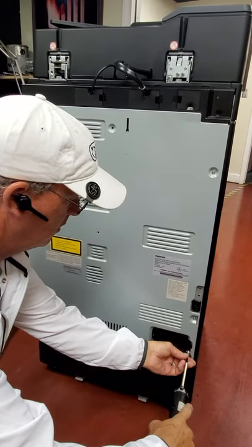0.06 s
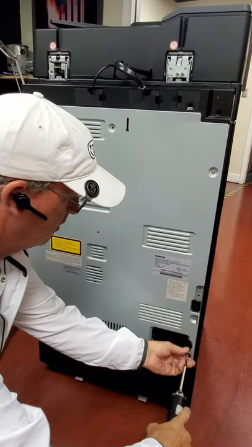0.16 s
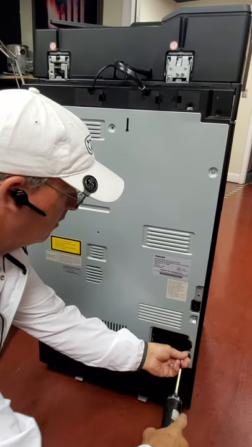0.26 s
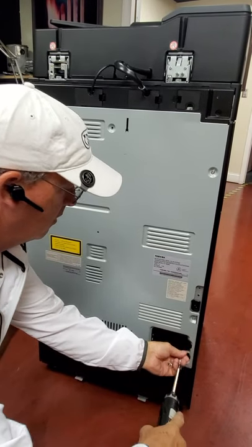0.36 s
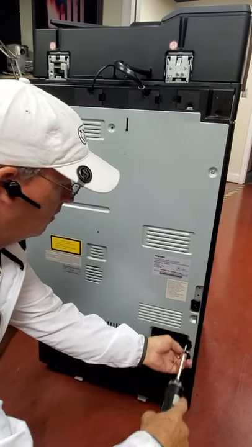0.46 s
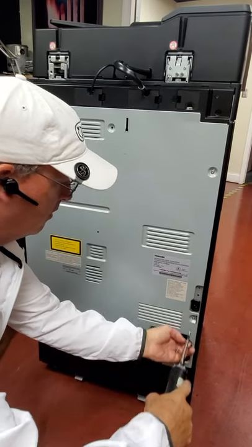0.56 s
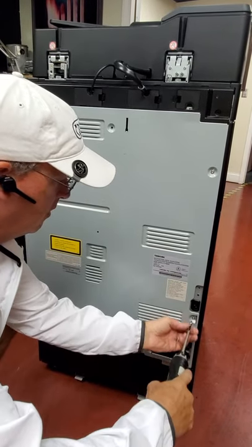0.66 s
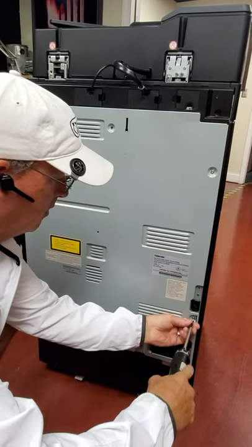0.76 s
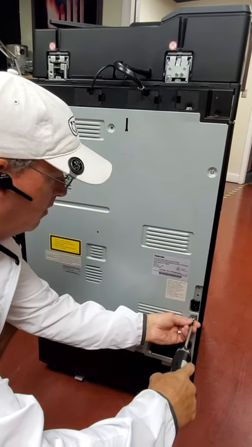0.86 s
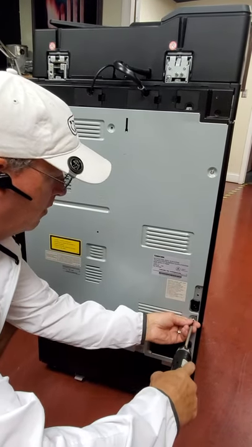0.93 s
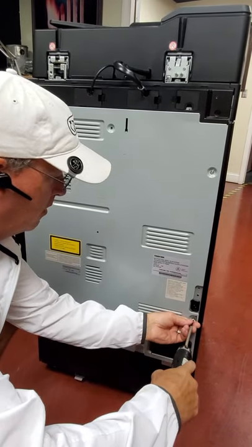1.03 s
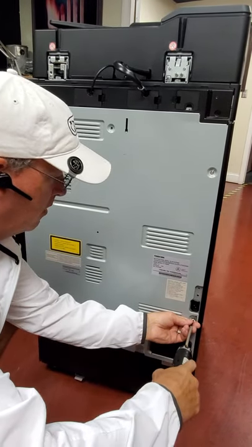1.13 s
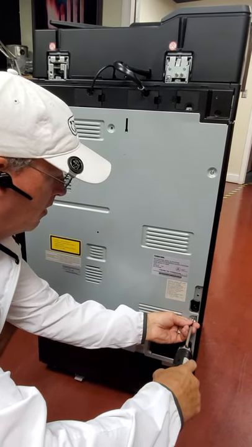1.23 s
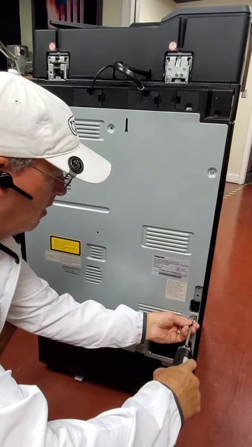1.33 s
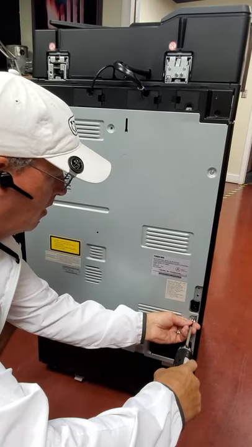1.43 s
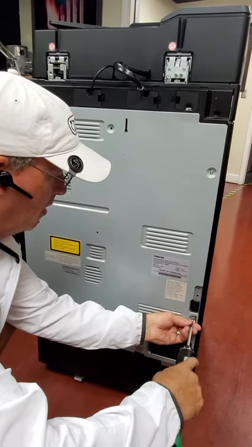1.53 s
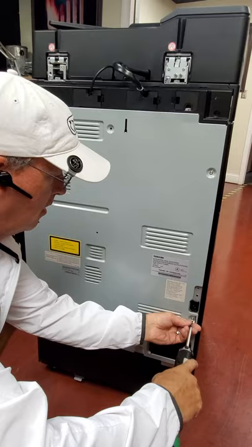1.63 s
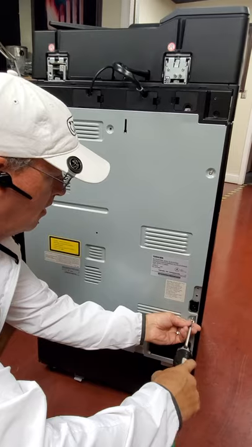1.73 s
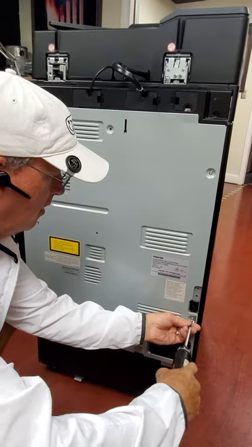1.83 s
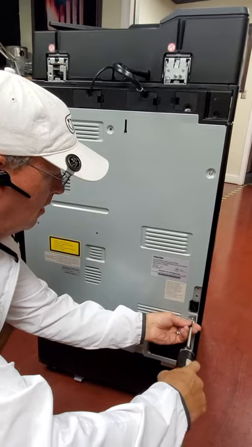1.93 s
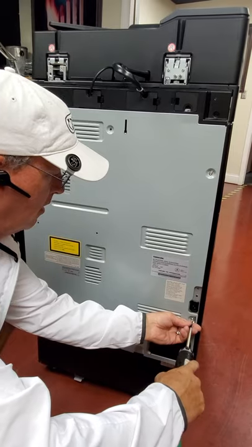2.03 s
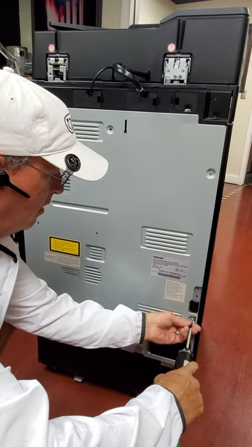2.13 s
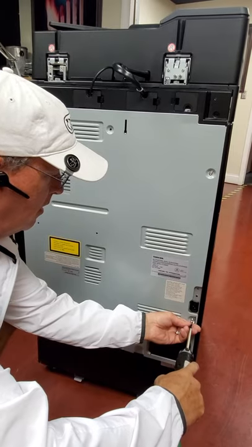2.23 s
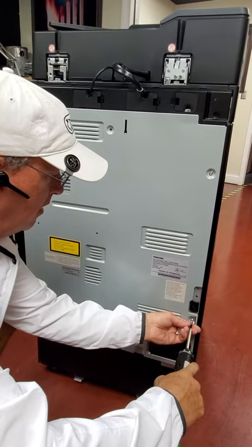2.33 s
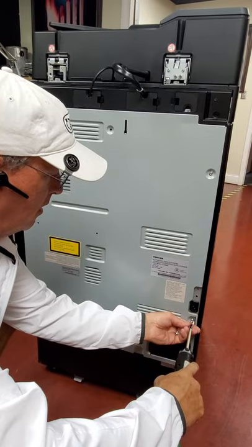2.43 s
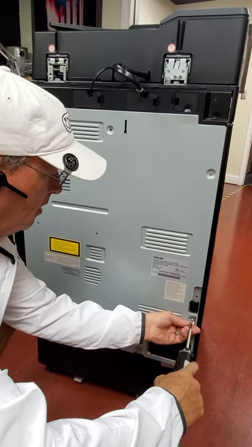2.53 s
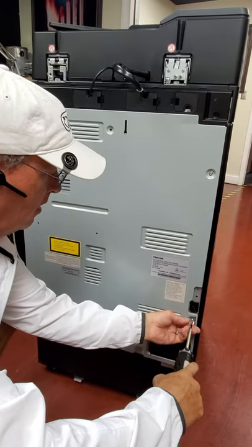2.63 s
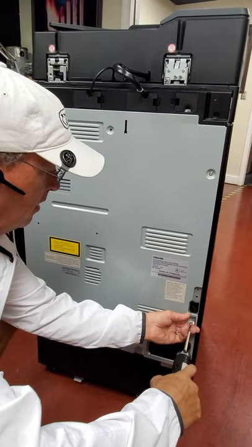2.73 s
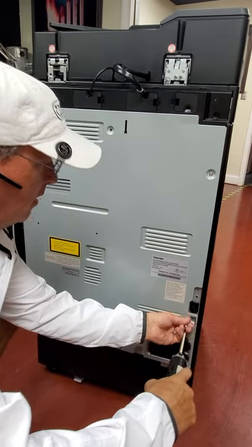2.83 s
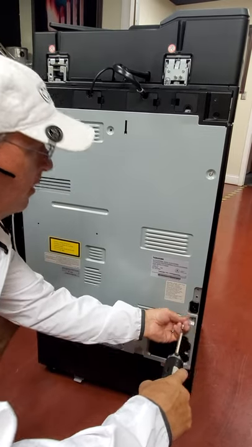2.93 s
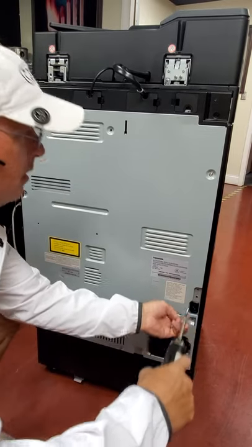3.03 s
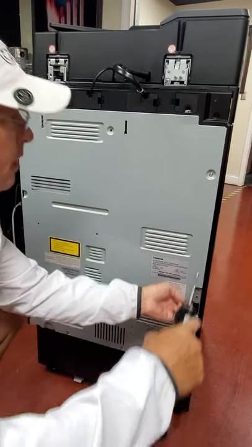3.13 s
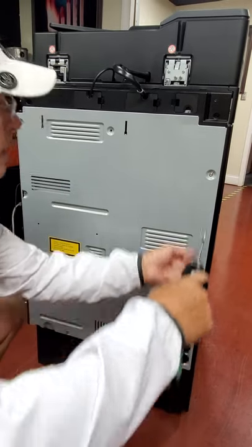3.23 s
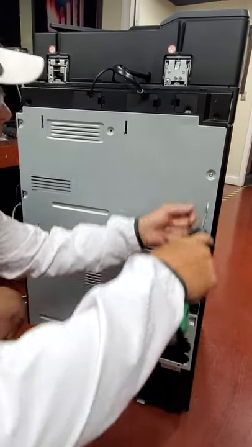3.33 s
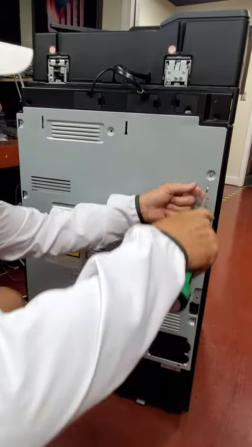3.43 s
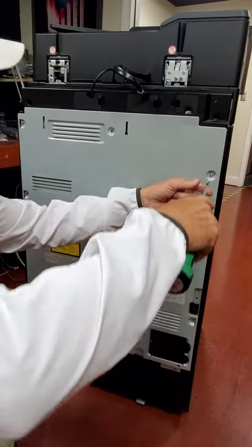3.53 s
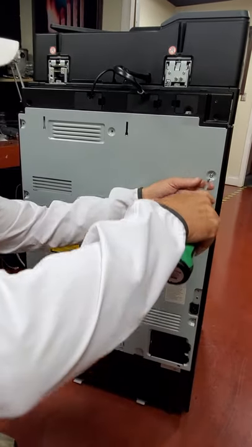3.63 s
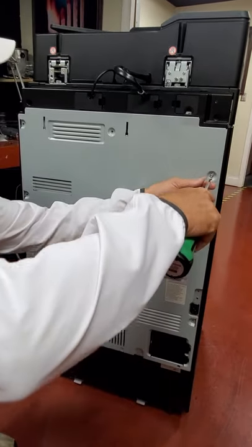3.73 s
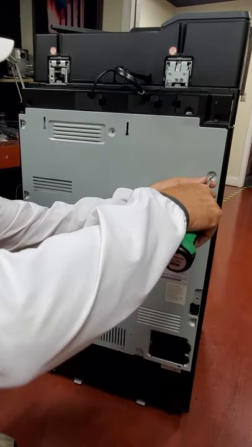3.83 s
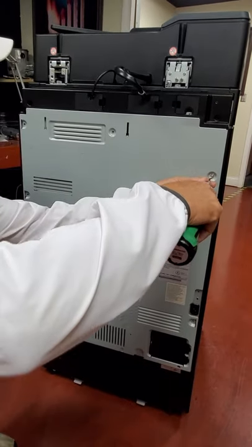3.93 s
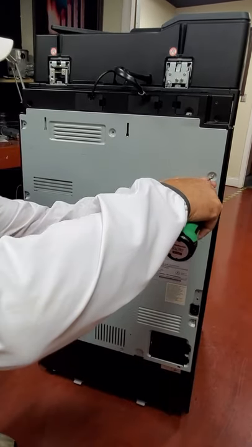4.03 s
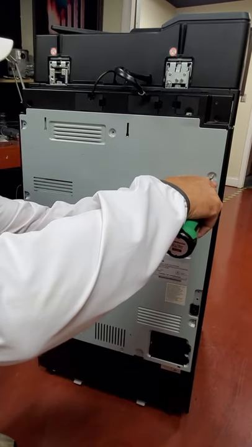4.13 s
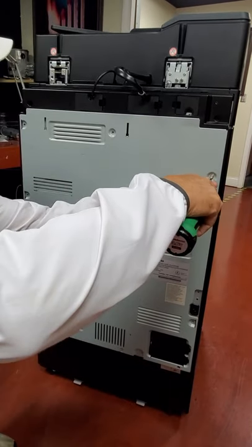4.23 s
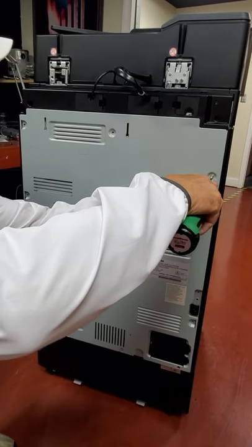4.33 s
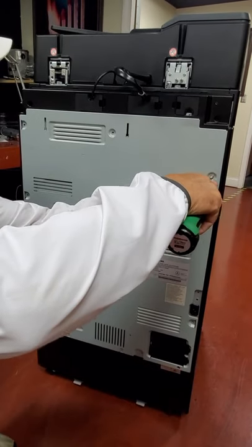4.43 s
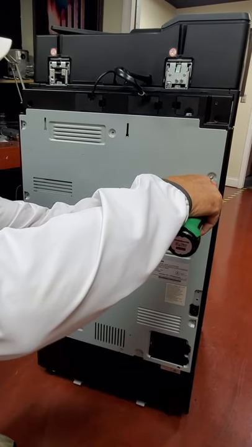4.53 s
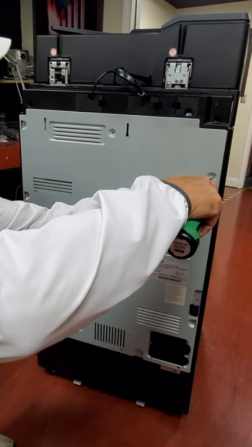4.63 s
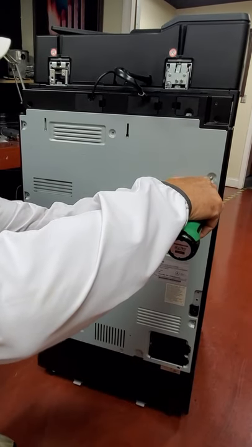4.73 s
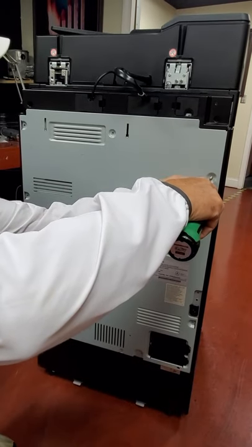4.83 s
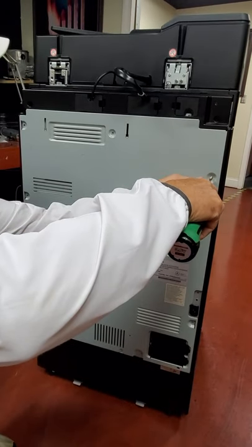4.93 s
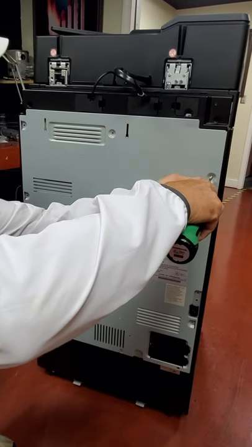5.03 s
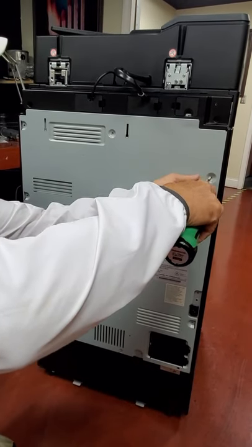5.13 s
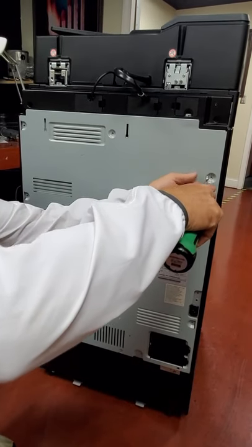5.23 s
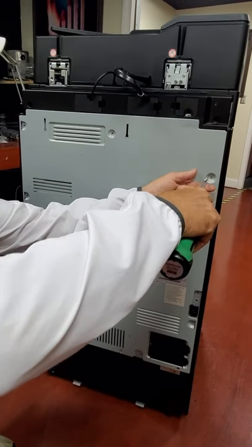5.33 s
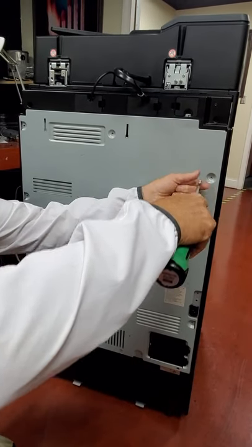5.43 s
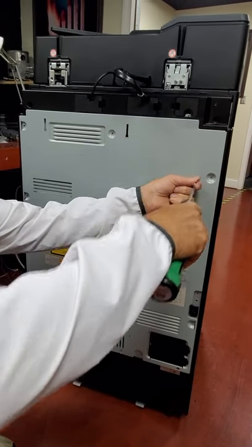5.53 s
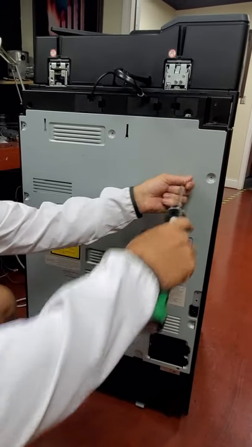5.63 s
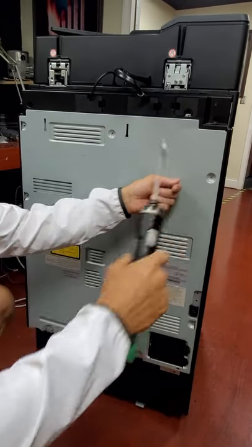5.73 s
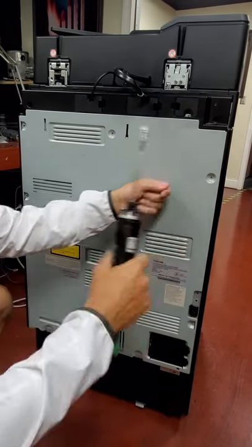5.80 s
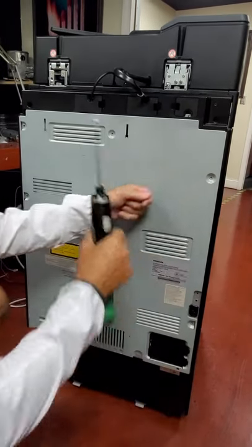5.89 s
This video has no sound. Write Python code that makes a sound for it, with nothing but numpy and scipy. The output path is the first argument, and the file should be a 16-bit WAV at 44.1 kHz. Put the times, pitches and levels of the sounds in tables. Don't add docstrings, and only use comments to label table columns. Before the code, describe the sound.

Gritty cordless screwdriver noise in a hard-floored room, picked up fairly close in stereo with a faint background hush. First a dying whirr, then a bit clicking into place, a drive of over a second with panel rumble, and a falling whirr. A pause brings knocks and scraping on sheet metal, then a sharp clack-filled short drive, a slowing whirr and faint loose-screw tinkles.

```python
import sys
import numpy as np
from scipy import signal
from scipy.fft import rfft, irfft, next_fast_len
from scipy.io import wavfile
from scipy.ndimage import uniform_filter1d

SR = 44100
rng = np.random.default_rng(int(sys.argv[2]) if len(sys.argv) > 2 else 0)


def inscribe(sig):
    pcm = np.round(np.clip(np.atleast_2d(sig).T, -1, 1) * 32767)
    wavfile.write(sys.argv[1], SR, pcm.astype(np.int16))


def decibels_to_gain(level_db):
    exponent = np.asarray(level_db, float) / 20
    return 10 ** exponent


N = 262836
T = np.arange(N) / SR

# pull_s, spinup_s, release_s, stop_s, hiss_db
BURSTS = [
    (-1, .1, .1, .55, -35.5),
    (1.44, .07, 2.7, 3.17, -35.2),
    (4.316, .02, 5.19, 5.76, -35.8),
]
# start_s, end_s
POWERED = [
    (1.74, 2.7),
    (4.4, 5.2),
]
# time_s, pitch_hz, level_db
SIXTH_ORDER = [
    [(1.92, 1004, -52.5), (1.974, 1012, -39), (2.048, 1015, -36.5), (2.076, 1014, -44), (2.126, 1009, -37),
     (2.212, 1013, -36.5), (2.32, 1026, -47), (2.5, 1025, -45.5), (2.62, 1011, -45.5), (2.67, 1005, -60)],
    [(4.46, 985, -62), (4.52, 993.8, -46.5), (4.604, 1002, -34), (4.75, 1008, -40), (4.79, 1016, -62)],
    [(4.84, 1034, -52), (5.0, 1036, -44), (5.012, 1037, -46), (5.09, 1037, -48), (5.12, 1010, -46),
     (5.15, 1000, -64)],
]
# time_s, half_length_s, extra_hiss_db
STRAINS = [
    (1.53, .04, 3),
    (1.61, .06, 6),
    (4.427, .02, 5),
    (4.65, .03, 2.5),
    (5.1, .05, .6),
]
SPINUP_DB, COAST_DB = 22, 33
EASE_S, EASE_DB = .1, -3
FILL_S, FILL_DB = .005, 8
GRAB_S = 5.62
JOLT_AFTER_S, JOLT_S, FULL_SPEED_S = .045, .03, .1
IDLE_HZ, LOADED_HZ, FREE_HZ = 40, 161, 166
SLOWING = .7

# pitch_hz, level_db (per Hz)
GEAR_COLOUR = [(1180, -27), (2000, -7.5), (2140, -13), (2330, -5.5), (2900, -2), (3170, -2), (3750, 0),
               (5140, -10.5), (6130, -4.5), (7360, -9), (9000, -22), (11700, -40), (19800, -120)]
BRUSH_COLOUR = [(5000, -10), (8500, -19), (9210, -24.5), (10900, -17), (15400, -3), (16200, -12),
                (16400, -28), (16500, -71)]
SHELL_COLOUR = [(590, -49.5), (1000, -20), (1170, -3), (1290, -2), (1480, 0), (1590, 2), (2130, -6.5),
                (2300, -10), (2990, -32.5), (5060, -120)]
HOUSING_COLOUR = [(240, -28), (400, -19.5), (465, -20), (674, -12.5), (759, -7), (1000, -11.5), (1150, -5),
                  (1500, -48.5), (2530, -120)]
# running_db, per_strain_db (per dB), standstill_db, release_jolt_db, pull_db
BRUSH_LAYER = (-3.2, -1, -5, 3.5, -14)
SHELL_LAYER = (-5.5, .4, 3, -1, 8)
HOUSING_LAYER = (-19.5, 2.2, -1, -4, 3)

# shell_hz, shell_db, tooth_order, tooth_db, second_tooth_db
COASTS = [
    (1640, -13, 10, -7, -14),
    (1400, -12, 10.8, -7, -6),
    (1530, -4, 10.8, -10, -12),
]
SHELL_WIDTH_HZ, TEETH_WIDTH_HZ = 190, 70
SECOND_TEETH = 1.24
TEETH_BEST_HZ, TEETH_STILL_DB = 1450, -17
RING_GROWS_DB = 6

ORDERS = [2, 4, 6, 7, 8, 10.1, 11, 14.1, 16.4, 18.03, 19.06, 20.33, 21.9, 24.08, 35, 35.3]
# long_drive_db, short_drive_db (over whine), follows_curve (0-1)
ORDER_LEVELS = [(-16, -6, 0), (-21.5, -9, 0), (-4.1, -2.6, .77), (-14, -4, 0), (-6, 0, 0), (-10, -22, 0),
                (-18, -4, .1), (-12, -19, .2), (-18, -16, .1), (-6, 6, .1), (-5, -2, 0), (-8, -18, .2),
                (-8, -19, .1), (-4, -20, .1), (-8, -15, 0), (-9, -11, 0)]
HEARD = {1: (4.78, 5.13), 3: (4.84, 5.14), 4: (4.68, 4.92), 6: (4.5, 4.75), 9: (4.52, 4.72),
         10: (4.75, 5.15)}
STEADY_WHINE_DB = -48

# pitch_hz, width_hz, level_db
BOOM_MODES = [(252.5, 63, -2.5), (307, 51, -1), (380, 28.6, -0.5), (570, 175, -6), (719, 173, -5.5)]
DEEP_MODES = [(72.2, 22, -5.5), (101.5, 14, 0.5), (136.5, 35, -2), (191.1, 36, -1)]
# pitch_hz, level_db (per Hz)
RATTLE_COLOUR = [(260, -37.5), (450, -6.5), (623, -2.5), (1070, -8), (1850, -6.5), (2410, -12),
                 (3100, -9.5), (4040, -22), (7360, -29), (9000, -47), (11700, -42), (19800, -120)]
# peak_s, boom_db, deep_over_boom_db, rise_s, fade_s (both for 20 dB)
JERKS = [(0, -50, -8, .01, .11), (1.486, -41, -6, .04, .2), (1.548, -32, 0, .09, .1),
         (1.606, -33, -6, .07, .11), (1.688, -34, -4.5, .08, .11), (1.75, -48, -4, .1, .07),
         (1.846, -48, -15, .2, .16), (2.472, -48, -10, .05, .08), (2.528, -49.5, -11, .08, .1),
         (2.68, -58, -8, .1, .13), (4.446, -39.5, -6, .05, .08), (4.55, -32, -17, .02, .1),
         (4.658, -30.5, -7.5, .035, .12), (4.818, -49, -18, .1, .08)]
# peak_s, boom_db, deep_over_boom_db, rise_s, fade_s
BUMPS = [(1.124, -62, -1, .025, .17), (1.284, -62, -12, .05, .12), (1.374, -61, 2, .06, .4),
         (3.438, -37, -8, .002, .015), (3.46, -42, -10, .01, .24), (3.545, -45, -9, .04, .2),
         (4.115, -47, -8, .04, .15), (5.312, -54, -3, .01, .07), (5.362, -53, -4, .006, .09),
         (5.67, -60, -2, .05, .1), (5.955, -55, -20, .04, .1)]
# peak_s, rattle_db, top_over_rattle_db, rise_s, fade_s
SCRAPES = [(.525, -78, 14, .004, .08), (.676, -66, 0, .003, .05), (1.165, -56, -20, .01, .02),
           (5.545, -52, -6, .003, .01), (1.245, -57, -30, .05, .02), (1.27, -39.5, -30, .002, .045),
           (1.342, -48, -30, .02, .14), (3.195, -66, -8, .005, .03), (3.222, -68, -2, .01, .2),
           (3.445, -59, -30, .004, .05), (3.46, -50, -2, .002, .12), (3.548, -42, -25, .08, .06),
           (3.57, -51, -2, .01, .13), (3.64, -52, -17, .1, .06), (4.085, -38.5, -23, .002, .12),
           (4.15, -43, -21, .05, .1), (4.275, -62, -8, .01, .06), (5.625, -48, -22, .003, .16),
           (5.76, -58, -6, .01, .05), (5.894, -68, 12, .005, .05), (5.95, -63, -7, .1, .05)]
TREMBLE_DB, TREMBLE_DEEP_DB = -26.5, -11

# start_s, peak_db, knock_db, snap_db, top_db (last three over the tick)
CLICKS = [(1.0984, -31, -7.5, -18, -28), (1.2578, -38, -2, -33, -37), (1.4466, -35, -27, -8, -14),
          (1.4682, -22, -14, -25, -20), (2.7374, -37, -32, 3, 10), (3.4367, -55, 26, -16, -19),
          (3.46, -35, -2, -1, -12), (3.514, -35, 2, -30, -30), (3.546, -39, 0, -25, -25),
          (3.5624, -38, -13, -3, -4), (3.924, -36, -4, -2.5, -4.5), (4.0615, -41, -7, -2.5, -4),
          (4.0823, -35, -2, -28, -22), (4.1205, -33, 3, -26, -25), (4.14, -40, -3, -20, -25),
          (4.167, -37, 4, -26, -25), (4.2706, -48.5, -5, -1, -9), (4.3192, -34, -25, -10, -15),
          (4.4185, -26, -20, -3, -6), (4.5437, -18.5, -3, -13, -14), (4.644, -23, -0.5, -3, -15)]
# start_s, peak_db, ring_db, snap_db, top_db (last three over the tick)
JINGLES = [
    (0.6742, -48, 2, -3, -1),
    (2.7455, -48, -10, 8, 24),
    (2.7525, -51, -10, 8, 24),
    (2.76, -49, -10, 8, 24),
    (2.7655, -49, -10, 6, 24),
    (2.7755, -52, -10, 8, 24),
    (5.7543, -36, 3.4, -14, -6),
    (5.7612, -40.5, 3, -18, 9),
    (5.7648, -42, -2, -3, 13),
    (5.895, -47, 3, -7, -4),
]
# pitch_hz, level_db (per Hz)
TICK_COLOUR = [(800, -13), (950, -3.5), (1570, -4.5), (1880, -4.5), (2400, -3), (4800, -4.5), (5200, -12),
               (5600, -11)]
SNAP_COLOUR = [(4600, -18), (5300, -7.5), (7300, 0), (8200, -1.5), (8700, -18)]
# pitch_hz, width_hz, level_db
KNOCK_MODES = [(320, 67, -6), (740, 110, 13), (148, 65, -10)]
SCREW_MODES = [(1690, 130, 0), (2720, 99, 6), (3600, 250, -12)]

# peak_s, pitch_hz,
# level_db, rise_s, fade_s (both for 20 dB)
SINGS = [(.18, 4100, -46, .06, .2), (.235, 1640, -48, .04, .06), (.45, 740, -67, .15, .5),
         (.678, 1640, -61, .006, .025), (1.11, 745, -54, .01, .12), (1.165, 760, -58, .03, .04),
         (1.12, 2090, -56, .02, .06), (1.275, 750, -53, .015, .15), (1.275, 1930, -59, .015, .1),
         (1.275, 1690, -57, .015, .06), (1.36, 555, -55, .05, .12), (1.86, 328, -41, .3, .09),
         (3.465, 4000, -55, .004, .05), (2.57, 1360, -41, .05, .08), (3.0, 790, -60, .08, .06),
         (3.05, 2200, -58, .05, .05), (3.2, 1560, -72, .1, .15), (3.24, 1330, -71, .06, .35),
         (3.25, 3440, -78, .08, .25), (3.93, 690, -52, .004, .04), (4.36, 1500, -47, .03, .06),
         (4.36, 2030, -47, .03, .05), (4.44, 690, -45, .1, .06), (4.68, 1840, -43, .05, .03),
         (5.05, 1500, -46, .04, .03), (5.07, 1200, -44, .05, .05), (5.19, 1460, -46, .12, .1),
         (5.55, 1600, -54, .05, .1), (5.65, 1620, -59, .04, .15), (5.7, 780, -58, .04, .04),
         (5.78, 1650, -62, .03, .15), (5.775, 10000, -62, .008, .05), (2.83, 1720, -48, .1, .08),
         (2.93, 1180, -51, .06, .1), (5.9, 1560, -65, .008, .06), (.68, 9300, -74, .006, .04),
         (5.9, 9400, -74, .006, .04), (.68, 3950, -68, .006, .025), (5.8, 3500, -66, .04, .1),
         (4.5, 3050, -46, .15, .1),
         (1.365, 140, -47, .025, .15), (1.43, 145, -54, .04, .1), (1.61, 382, -33, .12, .2),
          (1.6, 265, -41, .12, .1), (1.88, 92, -50, .1, .05), (1.98, 100, -57, .1, .05),
          (2.0, 400, -50, .04, .06), (1.62, 186, -37, .2, .12), (4.25, 100, -62, .1, .1),
          (5.65, 70, -64, .04, .04), (.07, 300, -54, .2, .2), (3.4405, 330, -35, .003, .016),
          (3.44, 150, -44, .003, .04), (4.0, 400, -58, .06, .1), (3.75, 200, -60, .08, .15),
          (3.462, 300, -42, .005, .07), (3.45, 200, -46, .01, .12), (3.545, 300, -43, .04, .08),
          (3.52, 190, -45, .02, .07), (3.53, 540, -47, .04, .08), (4.125, 640, -46, .03, .08),
          (4.2, 200, -57, .1, .12), (4.46, 340, -43, .08, .06), (4.56, 310, -41, .02, .08),
          (4.56, 610, -43, .02, .08), (4.665, 590, -40, .03, .08), (5.32, 240, -55, .01, .08),
          (5.955, 340, -56, .03, .05),
         (2.76, 4100, -43, .06, .3),
    (2.76, 7900, -46, .03, .15),
    (2.71, 800, -52, .05, .05),
    (4.5, 780, -47, .1, .1),
    (1.6, 760, -44, .12, .12),
    (4.1, 850, -50, .015, .1),
]
SING_WIDTH_HZ, SING_SHARE = 22, .04
SING_STEADY = .6

# pitch_hz, t60_s
ROOM_DECAY = [(150, 0.3), (500, 0.38), (1040, 0.37), (2760, 0.37), (7280, 0.45), (15000, 0.24)]
# pitch_hz, correlation (-1 to 1)
LIKENESS = [(30, .8), (60, 0.97), (130, 1), (290, 1), (640, 0.36), (1400, -0.13), (3100, -0.042),
            (15000, .01)]
# pitch_hz, level_db (per Hz)
HUSH_COLOUR = [(15, -6), (25, 1), (91, -8), (125, -29), (361, -4.5), (425, -23), (486, -9.5), (955, -12.5),
               (3880, -17), (7030, -24.5), (8050, -20), (8970, -39), (15800, -27)]
HUSH_DB = -69.5
# time_s, level_db (over the hush)
AIR_DRIFT = [(0, 8.5), (.8, 1), (.95, -3), (1.09, -4.5), (1.3, 0.5), (3.3, 2.5), (3.9, 1.5), (5.96, 6.5)]
# pitch_hz, left_over_right_db
LEAN = [(60, -1), (99, -2), (160, 0.5), (270, -6), (450, 2), (740, -3), (1220, -1), (2010, -2.0),
        (3330, -5.5), (5500, -2.5), (9080, 9.5), (15000, 6.0)]
EDGE_HZ = 15780


def shaft():
    rows = [(s, hz / 6) for table in SIXTH_ORDER for s, hz, _ in table]
    rows += [(s, LOADED_HZ) for s, _ in POWERED]
    for pull, spinup, release, stop, _ in BURSTS:
        rows += [(pull, IDLE_HZ), (pull + spinup, LOADED_HZ - IDLE_HZ), (release, FREE_HZ)]
        for left in np.linspace(0, .9, 10):
            rows.append((stop - left * (stop - release), FREE_HZ * left ** SLOWING))
    return np.interp(T, *np.transpose(sorted(rows)))


def effort():
    strain_db = sum(db * np.exp(-((T - s) / half) ** 2) for s, half, db in STRAINS)
    hiss, lost, jolt, start = np.zeros((4, N))
    for pull, spinup, release, stop, db in BURSTS:
        up = np.clip((T - pull) / spinup, 0, 1)
        down = np.clip((stop - T) / (stop - release), 0, 1)
        eased_db = EASE_DB * np.clip(1 + (T - release) / EASE_S, 0, 1)
        hiss += decibels_to_gain(db + eased_db + strain_db) * up ** (SPINUP_DB / 20) * down ** (COAST_DB / 20)
        lost += (1 - down) * (down > 0)
        start += np.clip(1 - (T - pull) / FULL_SPEED_S, 0, 1) * (up > 0)
        jolt += np.exp(-((T - release - JOLT_AFTER_S) / JOLT_S) ** 2)
    hiss *= np.clip((GRAB_S - T) / .06, 0, 1)
    hiss *= 1 + decibels_to_gain(FILL_DB) * np.exp(-T / FILL_S)
    return hiss, strain_db, lost, jolt, start


def motor(turns, hiss, strain_db, lost, jolt, start):
    grit_db = 3.35 * unit_rms(uniform_filter1d(rng.standard_normal(N), 30))
    throb = 1 + 0.37 * np.cos(4 * np.pi * turns)
    contacts = rng.standard_normal(N) * decibels_to_gain(grit_db) * throb
    out = unit_rms(colour(contacts, GEAR_COLOUR))
    layers = [(BRUSH_COLOUR, BRUSH_LAYER), (SHELL_COLOUR, SHELL_LAYER), (HOUSING_COLOUR, HOUSING_LAYER)]
    for body, (db, per_strain, still_db, jolt_db, start_db) in layers:
        level_db = db + per_strain * strain_db + still_db * lost + jolt_db * jolt + start_db * start
        out += unit_rms(colour(contacts, body)) * decibels_to_gain(level_db)
    return out * hiss * decibels_to_gain(1.07 * wander(rate_hz=12))


def rundown(speed_hz, coasting):
    noise, out = rng.standard_normal(N), 0
    coast = np.searchsorted([pull for pull, *_ in BURSTS[1:]], T)
    shell_hz, shell_db, teeth, first_db, second_db = np.array(COASTS)[coast].T
    layers = [(shell_hz, shell_db, SHELL_WIDTH_HZ)]
    for hz, db in [(teeth * speed_hz, first_db), (SECOND_TEETH * teeth * speed_hz, second_db)]:
        octaves_away = np.log2((hz + 1) / TEETH_BEST_HZ)
        layers.append((hz, db + TEETH_STILL_DB * octaves_away ** 2, TEETH_WIDTH_HZ))
    for hz, db, width_hz in layers:
        carrier = np.exp(2j * np.pi * np.cumsum(hz) / SR)
        r = np.exp(-np.pi * width_hz / SR)
        narrow = signal.lfilter([1], [1, -2 * r, r * r], noise / carrier)
        out = out + decibels_to_gain(db) * unit_rms((carrier * narrow).real)
    return out * coasting


def whine(turns):
    rows, out = np.concatenate(SIXTH_ORDER), np.zeros((2, N))
    for burst, (start, end) in enumerate(POWERED):
        on = slice(round(start * SR), round(end * SR))
        t = T[on]
        curve_db = np.interp(t, rows[:, 0], rows[:, 2])
        ends = signal.windows.tukey(len(t), .15)
        for row, (order, (*db, follows)) in enumerate(zip(ORDERS, ORDER_LEVELS)):
            level_db = db[burst] + follows * curve_db + (1 - follows) * STEADY_WHINE_DB
            if burst and row in HEARD:
                first, last = HEARD[row]
                level_db = level_db - 400 * np.maximum(np.maximum(first - t, t - last), 0)
            jitter = .03 * order * wander(rate_hz=14, at=t)
            for side in out:
                drift = jitter + 1.6 * rng.random() * (order > 8)
                swell_db = 5.0 * abs(1 - follows) * wander(rate_hz=6, at=t)
                tone = np.sqrt(2) * np.cos(2 * np.pi * order * turns[on] + drift)
                add(side, start, decibels_to_gain(level_db + swell_db) * tone * ends)
    return out


def panel(running):
    slip_size = decibels_to_gain(3.2 * np.minimum(rng.exponential(1, N), 4))
    slips = (rng.random(N) < 500 / SR) * slip_size * rng.choice([-1, 1], N)
    drive = unit_rms(slips) + 0.6 * rng.standard_normal(N)
    tremble = decibels_to_gain(TREMBLE_DB) * running
    boom = unit_rms(resonate(resonate(drive, BOOM_MODES), BOOM_MODES))
    boom = boom * (envelope(JERKS + BUMPS) + tremble)
    deep = unit_rms(resonate(resonate(drive, DEEP_MODES), DEEP_MODES))
    deep = deep * (envelope(JERKS + BUMPS, second=1) + decibels_to_gain(TREMBLE_DEEP_DB) * tremble)
    rattle = unit_rms(colour(drive, RATTLE_COLOUR)) * envelope(SCRAPES)
    top = unit_rms(colour(drive, BRUSH_COLOUR)) * envelope(SCRAPES, second=1)
    return boom + deep + rattle + top


def clicks(rows, body, contact_s):
    blow = 1. * (np.arange(3000) == 0)
    push = np.sin(np.pi * np.minimum(np.arange(3000) / SR / contact_s, 1)) + blow
    voices = [colour(blow, TICK_COLOUR), resonate(push, body)]
    voices += [colour(blow, SNAP_COLOUR), colour(blow, BRUSH_COLOUR)]
    voices = np.array([x / np.linalg.norm(x) for x in voices]) * decibels_to_gain([[19], [15], [19], [23]])
    out = np.zeros(N)
    for s, db, *over_db in rows:
        add(out, s, decibels_to_gain(db + np.array([0] + over_db)) @ voices)
    return out


def sings():
    left, other = rng.standard_normal((2, N))
    out = np.zeros((2, N))
    for s, hz, db, rise, fade in SINGS:
        on = slice(max(round((s - 2 * rise) * SR), 0), round((s + 2 * fade) * SR))
        t = T[on]
        mode = [(hz, SING_WIDTH_HZ + SING_SHARE * hz, 0)]
        level_db = db - 20 * np.maximum((s - t) / rise, (t - s) / fade)
        right = left[on] + min(hz / 900, 1.2) * other[on]
        for side, noise in zip(out, [left[on], right]):
            tone = unit_rms(resonate(resonate(noise, mode), mode))
            flutter = abs(signal.hilbert(tone, next_fast_len(len(tone)))[:len(tone)])
            tone = unit_rms(tone / (flutter + .2) ** SING_STEADY)
            add(side, t[0], tone * decibels_to_gain(level_db))
    return out


def room(x, direct_db, turns_hz):
    out = decibels_to_gain(direct_db) * np.array([x, np.roll(x, 8)])
    t = np.arange(400) * 64 / SR
    for k in range(3):
        tail = diffuse_pair(400, 256, lambda hz: -60 * t / read(ROOM_DECAY, hz)[:, None])
        tail *= np.clip(np.arange(tail.shape[1]) / 60, 0, 1)
        tail /= np.linalg.norm(tail, axis=1, keepdims=True)
        share = np.sqrt(2 / 3) * np.cos(np.pi * (turns_hz * T + k / 3))
        out += signal.oaconvolve((x * share)[None], tail, axes=1)[:, :N]
    return out


def hush():
    air = diffuse_pair(N // 256 + 5, 1024, lambda hz: read(HUSH_COLOUR, hz)[:, None])[:, :N]
    return decibels_to_gain(HUSH_DB) * unit_rms(air) * decibels_to_gain(np.interp(T, *np.transpose(AIR_DRIFT)))


def diffuse_pair(frames, size, points_db):
    hz = np.fft.rfftfreq(size, 1 / SR)
    a, b, c, d = rng.standard_normal((frames, len(hz), 4)).T
    same = np.clip(read(LIKENESS, hz), -1, 1)[:, None]
    left = a + 1j * b
    right = same * left + np.sqrt(1 - same ** 2) * (c + 1j * d)
    z = np.array([left, right]) * decibels_to_gain(points_db(hz))
    return signal.istft(z, nperseg=size, noverlap=size * 3 // 4)[1]


def unit_rms(x):
    return x / np.sqrt(np.mean(x ** 2) + 1e-20)


def read(points, hz):
    f, value = np.transpose(points)
    return np.interp(np.log(hz + 1), np.log(f + 1), value)


def colour(x, points):
    hz = abs(np.fft.fftfreq(4096, 1 / SR))
    edged = [(points[0][0] * .7, -70)] + list(points) + [(points[-1][0] * 1.08, -70)]
    log_gain = np.log(decibels_to_gain(read(edged, hz)))
    taps = np.fft.ifft(np.exp(np.conj(signal.hilbert(log_gain)))).real[:2048]
    return signal.oaconvolve(x, taps / np.linalg.norm(taps))[:len(x)]


def resonate(x, modes):
    out = np.zeros(len(x))
    for k, (hz, width_hz, db) in enumerate(modes):
        b, a = signal.iirpeak(hz, hz / max(width_hz, 8), SR)
        out += (-1) ** k * decibels_to_gain(db) * signal.lfilter(b, a, x)
    return out


def envelope(rows, second=0):
    power = np.zeros(N)
    for s, db, over_db, rise, fade in rows:
        on = slice(max(round((s - 4 * rise) * SR), 0), round((s + 4 * fade) * SR))
        fall_db = 20 * np.maximum((s - T[on]) / rise, (T[on] - s) / fade)
        power[on] += decibels_to_gain(2 * (db + second * over_db - fall_db))
    return np.sqrt(power)


def wander(rate_hz, at=T):
    coarse = rng.standard_normal(int(N / SR * 40) + 2)
    smooth = unit_rms(uniform_filter1d(coarse, max(int(40 / rate_hz), 1)))
    return np.interp(at, np.arange(len(coarse)) / 40, smooth)


def add(mix, s, sound):
    part = mix[round(s * SR):][:len(sound)]
    part += sound[:len(part)]


def scene():
    speed_hz = shaft()
    hiss, strain_db, lost, jolt, start = effort()
    turns = np.cumsum(speed_hz) / SR
    shake = panel(hiss * (1 - lost) ** 4)
    touches = clicks(CLICKS, KNOCK_MODES, contact_s=0.0015)
    jingles = clicks(JINGLES, SCREW_MODES, contact_s=0.00017)
    coasting = hiss * np.minimum(lost / .05, 1) * decibels_to_gain(RING_GROWS_DB * lost)
    tool = decibels_to_gain(0.79) * motor(turns, hiss, strain_db, lost, jolt, start) + rundown(speed_hz, coasting)
    near = tool + decibels_to_gain(-2.5) * shake + touches + decibels_to_gain(-16) * jingles
    scatter = rng.standard_normal((2, 220)) * np.exp(-np.arange(220) / 50)
    scatter /= np.linalg.norm(scatter[0])
    first = (decibels_to_gain(-20) * touches + decibels_to_gain(-9) * jingles)[None]
    straight = signal.oaconvolve(first, scatter, axes=1)[:, :N] + decibels_to_gain(-5.5) * shake
    return room(near, direct_db=-11, turns_hz=5.5) + straight + whine(turns) + hush() + sings()


def roll_off(x):
    return signal.sosfilt(signal.butter(12, 17020, fs=SR, output="sos"), x)


def record(dry):
    size = next_fast_len(N + 999)
    hz = np.fft.rfftfreq(size, 1 / SR)
    lean = decibels_to_gain(read(LEAN, hz) / 2)
    edge = decibels_to_gain(-62 * np.clip((hz - EDGE_HZ) / 150, 0, 1))
    bass_cut = 1 / np.hypot(1, (62 / (hz + 1)) ** 2)
    response = np.array([lean, 1 / lean]) * edge * bass_cut
    ports = irfft(rfft(dry, size) * response, size)[:, :N]
    return roll_off(ports)


dry = scene()
out = record(dry)
inscribe(out)
```